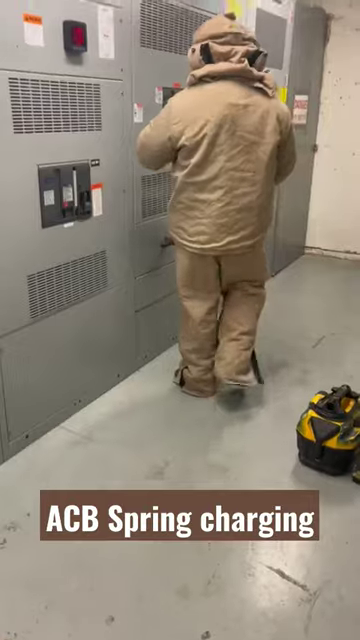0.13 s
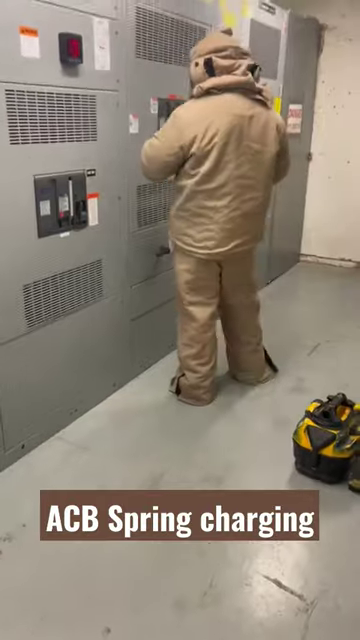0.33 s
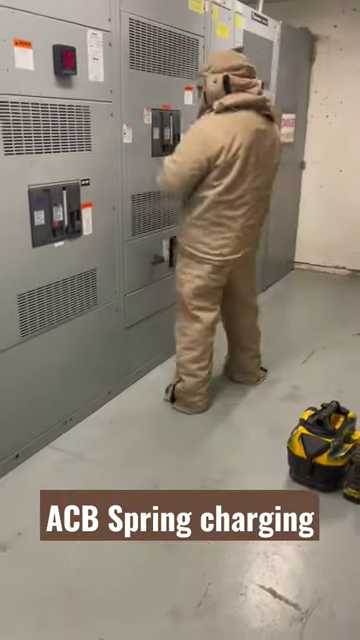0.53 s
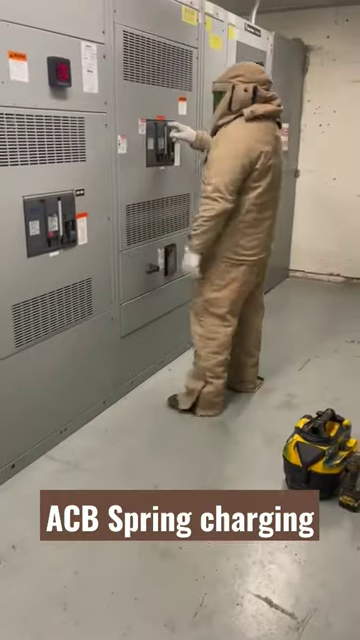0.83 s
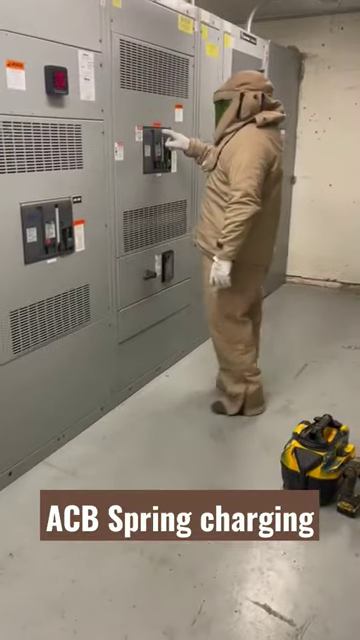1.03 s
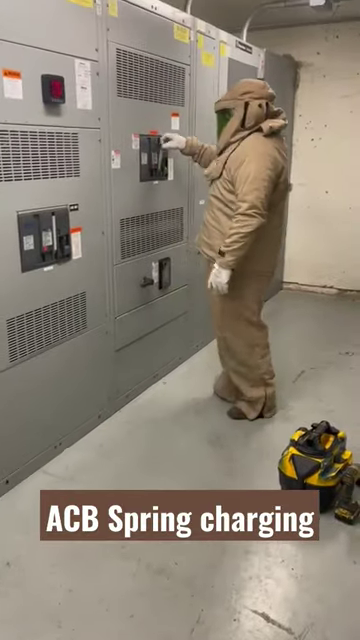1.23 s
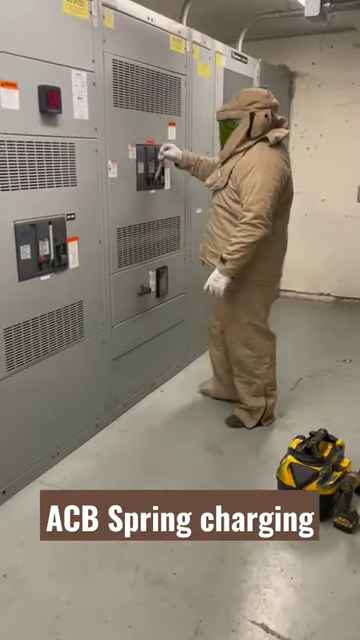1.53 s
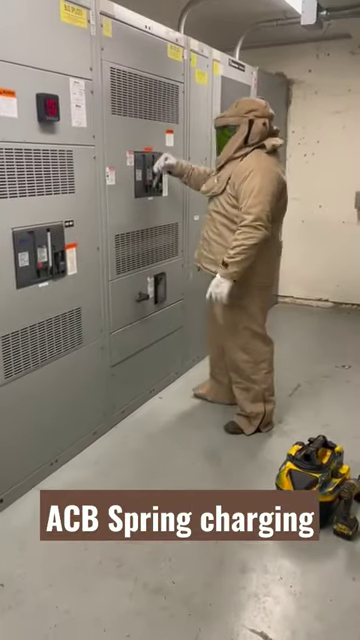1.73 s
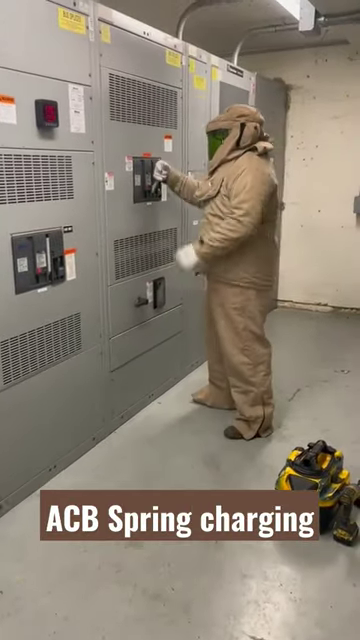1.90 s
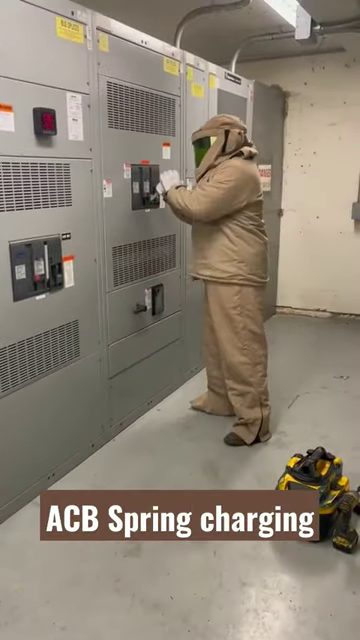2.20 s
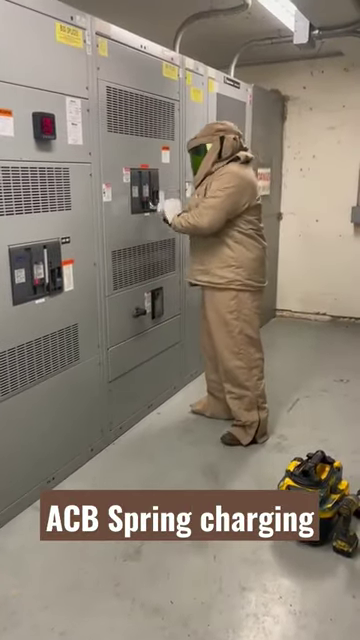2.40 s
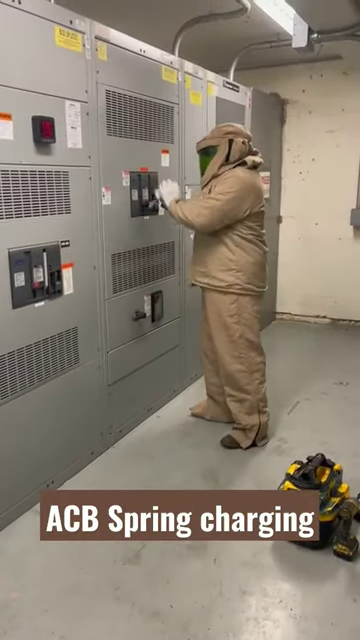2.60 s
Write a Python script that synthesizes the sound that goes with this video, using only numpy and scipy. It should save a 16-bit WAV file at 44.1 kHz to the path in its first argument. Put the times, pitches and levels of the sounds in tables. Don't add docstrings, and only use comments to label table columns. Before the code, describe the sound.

Metal handle clacks on a breaker, faint taps first, then loud ringing strokes near the end, over a fast-throbbing low hum, rushing air and wavering fan whine in a hard concrete room, caught by a phone.

```python
import sys
import numpy as np
from scipy import signal
from scipy.fft import rfft, irfft
from scipy.io import wavfile
from scipy.ndimage import uniform_filter1d

SR = 44100
rng = np.random.default_rng(int(sys.argv[2]) if len(sys.argv) > 2 else 0)


def natural_amplitude(level_db):
    exponent = np.asarray(level_db, float) / 20
    return 10 ** exponent


def master_out(mix):
    frames = np.transpose(np.atleast_2d(mix))
    ceiling = np.clip(frames, -1, 1)
    pcm = np.round(ceiling * 32767).astype(np.int16)
    wavfile.write(sys.argv[1], SR, pcm)


N = 121275
T = np.arange(N) / SR
THIRDS = 30 * 2 ** (np.arange(27) / 3)
STEP = 2 ** (1 / 6)
HIGH_THIRDS = THIRDS[16:]


def walk(rate_hz):
    k = int(SR / rate_hz)
    steps = np.repeat(rng.standard_normal(N // k + 1), k)
    return 1.4 * uniform_filter1d(uniform_filter1d(steps, k), k)[:N]


def band(x, lo_hz, hi_hz, soft=.01):
    f = np.fft.rfftfreq(len(x), 1 / SR) + 1

    def edge(hz):
        return np.clip(.5 + np.log(f / hz) / (2 * max(soft, .001)), 0, 1)

    return irfft(rfft(x) * np.sqrt(edge(lo_hz) * (1 - edge(hi_hz))), len(x))


def third(x, hz, soft):
    return band(x, hz / STEP, hz * STEP, soft)


def read(table, hz, column=1):
    table = np.array(table, float)
    return np.interp(np.log(hz), np.log(table[:, 0]), table[:, column])


def over_time(table):
    return np.interp(T, *np.array(table).T)


def unit(x):
    return x / np.sqrt(np.mean(x ** 2))


def follow(x):
    return 10 * np.log10(uniform_filter1d(x ** 2, size=1400, origin=500) + 1e-14)


# multiple of the turn rate, peak level in dB.
THROB_ORDERS = [(4, -26.5), (5, -26.5), (6, -26), (7, -32.5), (8, -30.5), (9, -52), (10, -32), (12, -33.5),
                (13, -44.5), (17, -36), (18, -50), (20, -35.5), (22, -29)]


def machine():
    turn_hz, delay_s, extra_delay_s = 15.03, .040, .0055
    out = 0
    for order, db in THROB_ORDERS:
        n = order - THROB_ORDERS[0][0]
        lag = 2 * np.pi * turn_hz * (delay_s * n + extra_delay_s * n ** 2 / 2)
        level = natural_amplitude(db + 0.74 * walk(4.35))
        out = out - level * np.cos(2 * np.pi * order * turn_hz * T - lag + 0.083 * walk(2.97))
    return out


# frequency in Hz, spectral density in dB per Hz.
AIR_SPECTRUM = [(45, -13), (62, 2.5), (130, -2.5), (480, -8.5), (600, -13.5), (2300, -21), (3500, -33),
                (12000, -54.5)]
# time in seconds, level in dB.
AIR_FLOW = [
    (.1, -0.1),
    (.9, -0.05),
    (1.5, 0.36),
    (2.1, -0.04),
    (2.5, 1.5),
    (2.75, 2.1),
]


def rushing_air():
    air_db, flicker_db = -24.5, 0.86
    out = 0
    for hz in THIRDS:
        level = natural_amplitude(read(AIR_SPECTRUM, hz) + flicker_db * walk(9.2))
        out = out + level * third(rng.standard_normal(N), hz, 0.088)
    return natural_amplitude(air_db + over_time(AIR_FLOW)) * unit(out)


# multiple of the blade rate, level in dB, wander in dB.
BLADE_HARMONICS = [(1, 4, 1.46), (2, -32, 0.5), (3, -42.5, 2.5), (4, -51, 6)]
# time in seconds, level in dB.
BLADE_FADING = [(0.12, -26.5), (0.29, -38), (0.41, -29.5), (0.53, -28), (0.57, -46), (0.65, -29.5),
                (0.91, -37), (1.35, -28.5), (1.91, -43), (2.15, -29), (2.26, -53), (2.32, -34.5),
                (2.51, -27), (2.54, -45), (2.6, -28), (2.75, -64)]


def fan_whine():
    blade_hz = 477.5
    fading_db = over_time(BLADE_FADING)
    out = 0
    for k, db, wander_db in BLADE_HARMONICS:
        level = natural_amplitude(db + fading_db * (k == 1) + wander_db * walk(6.83))
        out = out + level * np.sin(2 * np.pi * k * blade_hz * T + 0.36 * walk(5.25) + k)
    return out


# frequency in Hz, peak level in dB.
SMALL_FAN_TONES = [(691.5, -49), (1382.5, -47)]


def small_fan():
    out = 0
    for hz, db in SMALL_FAN_TONES:
        out = out + natural_amplitude(db + 2.6 * walk(6.04)) * np.sin(2 * np.pi * hz * T + .6 * walk(4.62))
    return out


# time in seconds, rustle level in dB.
SUIT_EFFORT = [(.12, -59), (.36, -41.5), (.46, -66), (.72, -53), (.8, -44), (.86, -49.5), (.92, -41),
               (1.03, -47), (1.11, -44), (1.16, -56), (1.4, -46), (1.55, -48), (1.63, -42), (1.77, -57.5),
               (1.88, -54.5), (1.93, -43.5), (2.03, -75), (2.75, -68)]
# frequency in Hz, spectral density in dB per Hz.
CLOTH_SPECTRUM = [(1500, -8), (3000, 0.5), (7000, 2.5), (9000, -4.5), (11000, 4), (12500, -8.5)]


def suit():
    crinkles_per_s, spread_db = 2800, -1.5
    chance = rng.random((N, 2))
    struck = chance[:, 0] < crinkles_per_s / SR
    grains = struck * natural_amplitude(-spread_db * np.log(chance[:, 1] + 1e-9))
    x = rng.standard_normal(N) * (1.2 + uniform_filter1d(grains, size=24) * 12)
    out = sum(natural_amplitude(read(CLOTH_SPECTRUM, hz)) * third(x, hz, .1) for hz in HIGH_THIRDS)
    return unit(out) * natural_amplitude(over_time(SUIT_EFFORT))


# start in seconds, frequency in Hz, level in dB, t60 in seconds.
PANEL_BUZZES = [(0.581, 3280, -46, .2), (0.807, 4040, -41, 0.28), (1.175, 2600, -36, 0.13),
                (2.169, 2960, -39, .15), (2.169, 6560, -32, 0.32), (2.198, 3980, -38, .5),
                (2.27, 3080, -30.5, 0.22), (2.269, 7240, -26.5, 0.41), (2.277, 11000, -36.5, 0.4),
                (2.545, 830, -31, 1.1), (2.535, 2580, -32, 0.25), (2.54, 6500, -39.5, 0.47),
                (2.698, 2380, -33, 0.41)]


def panels():
    attack_s, share = 0.00073, 0.098
    out, n = np.zeros(2 * N), SR // 2
    t = np.arange(n) / SR
    rise = 1 - np.exp(-t / attack_s)
    for at, hz, db, t60 in PANEL_BUZZES:
        buzz = unit(band(rng.standard_normal(n), hz * (1 - share), hz * (1 + share), 0.06))
        out[int(at * SR):][:n] += natural_amplitude(db - 60 * t / t60) * rise * buzz
    return out[:N]


# start in seconds, level in dB, brightness in dB per octave,
# rattle in seconds, attack in seconds.
HANDLE_CLACKS = [(0.802, -40.5, -11, .015, 0.0023), (.892, -40, -5.5, .02, 0.0048),
                 (1.093, -38, -1.5, .015, 0.003), (1.175, -36.5, -3, 0.0045, .001),
                 (1.265, -41, -5, .01, .002), (2.044, -65, -2, .01, .002),
                 (2.170, -31, -3.6, .012, 0.00046), (2.266, -39, -8, .004, .001),
                 (2.268, -24.5, -1.1, 0.031, 0.00086), (2.527, -28, 0.7, 0.018, .005),
                 (2.566, -42, -1.1, .006, .001), (2.693, -40, 8.5, .03, 0.0018)]
# frequency in Hz, spectral density in dB per Hz, t60 in seconds.
STEEL_SPECTRUM = [(1200, -12, 0.59), (2100, -11, 0.5), (2760, -6.5, 0.62), (4900, -11, 0.64),
                  (6550, -9.5, 0.92), (7940, -11.5, 0.24), (11000, -19.5, 0.38), (13500, -19, 0.44)]


def handle():
    tail_db, crack_db, crack_s = 1.5, -8.5, 0.0012
    ring_db, ring_t60_s = -4.5, 0.5
    out, n = np.zeros(2 * N), SR // 2
    t = np.arange(n) / SR
    for at, db, tilt_db, rattle_s, attack_s in HANDLE_CLACKS:
        noise, clack = rng.standard_normal(n), 0

        def colour(hz):
            return read(STEEL_SPECTRUM, hz) + np.clip(tilt_db, -3, 4) * np.log2(hz / 5000)

        burst = np.exp(-(t / max(rattle_s, .002)) ** 2) + natural_amplitude(crack_db) * np.exp(-t / crack_s)
        for hz in HIGH_THIRDS:
            tail = natural_amplitude(tail_db - 60 * t / read(STEEL_SPECTRUM, hz, column=2))
            clack = clack + 2 * natural_amplitude(colour(hz)) * third(noise, hz, 0.11) * (burst + tail)
        for u, v, w in rng.random(size=(24, 3)):
            hz = 2000 * 4 ** u
            level = natural_amplitude(ring_db + colour(hz) - 8 * v - 60 * t / (ring_t60_s * (0.84 + w)))
            clack = clack + level * np.sin(2 * np.pi * (hz * t + v))
        out[int(at * SR):][:n] += natural_amplitude(db) * (1 - np.exp(-t / max(attack_s, 3e-4))) * clack
    return out[:N]


def scene():
    return (machine() + rushing_air() + fan_whine() + small_fan() + suit() + panels() + handle())[None]


# low edge in Hz, high edge in Hz, start in seconds, end in
# seconds.
GAP_BANDS = [
    (4760, 4960, 0, 3),
    (8050, 8850, 0, 2.1),
    (8050, 8850, 2.58, 3),
    (8850, 9200, 0, 1.95),
    (9000, 9350, 2.29, 2.69),
    (9900, 10430, .81, 2.17),
    (9200, 9750, .81, 2.17),
    (12200, 12700, 0, 3),
    (12700, 13600, 0, 3),
]
# depth in dB, level that fills the gap in dB.
GAP_DEPTHS = [(-25, -49.5), (-41, -47), (-35, -45), (-36, -50), (-27, -37), (-13, -48), (-17, -48),
              (-50, -59), (-50, -59)]


def spectral_gaps(x):
    for (lo_hz, hi_hz, start, end), (db, fill_db) in zip(GAP_BANDS, GAP_DEPTHS):
        part = band(x, lo_hz, hi_hz, .004)
        faint = np.clip((fill_db + 2.5 * walk(12) - follow(part)) / 3, 0, 1)
        patchy = np.clip(1.7 + (lo_hz > 12000) + walk(9.1), 0, 1)
        active = uniform_filter1d(1. * (T >= start) * (T < end), size=400)
        x = x - (1 - natural_amplitude(db)) * faint * patchy * active * part
    return x


def passing_holes(x):
    width_hz, odds, depth_db = 110, 1.4, -16
    for lo_hz in range(3300, 8000, 390):
        is_open = np.clip((walk(10) - odds) * 4 + .5, 0, 1)
        x = x - (1 - natural_amplitude(depth_db)) * is_open * band(x, lo_hz, lo_hz + width_hz, .002)
    return x


# start in seconds, top frequency in Hz.
TREBLE_STEPS = [
    (0, 6550),
    (.245, 8050),
    (.44, 13600),
]


def stepped_treble(x):
    y = np.zeros(N)
    for start, top_hz in TREBLE_STEPS:
        y = y + np.clip((T - start) * 100 + 1, 0, 1) * (band(x, 20, top_hz, .004) - y)
    return y


# frequency in Hz, start in seconds.
WHISTLE_TONES = [
    (8440, .27),
    (8786, 1.15),
    (9819, .81),
    (10508, .81),
]
WHISTLE_LEVELS = [-6, -18, -3, -2]


def whistles(treble_db):
    out = 0
    for (hz, start), db in zip(WHISTLE_TONES, WHISTLE_LEVELS):
        level = natural_amplitude(db + np.minimum(treble_db, -52) + 2.5 * walk(14))
        out = out + level * np.clip((T - start) / .01, 0, 1) * np.sin(2 * np.pi * hz * T)
    return out


def start_and_skip(x):
    start_s, skip_s, skip_len_s = .104, .283, .024
    skip = np.clip(2 - 2 * np.abs(T - skip_s) / (skip_len_s / 2), 0, 1)
    x = x - .85 * skip * band(x, 20, 900, .1)
    return x * np.clip((T - start_s) / 0.0038, 0, 1)


def roll_off(x):
    return signal.sosfilt(signal.butter(12, 13300, fs=SR, output="sos"), x)


def record(dry):
    x = dry[0]
    treble_db = follow(band(x, 10500, 12200))
    x = passing_holes(spectral_gaps(x))
    y = stepped_treble(x) + whistles(treble_db)
    return roll_off(start_and_skip(y)[None])


dry = scene()
out = record(dry)
master_out(out)
```